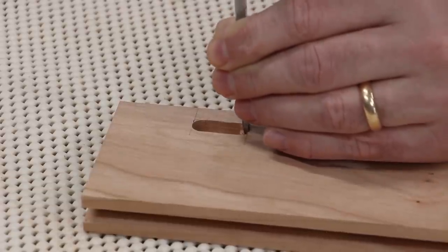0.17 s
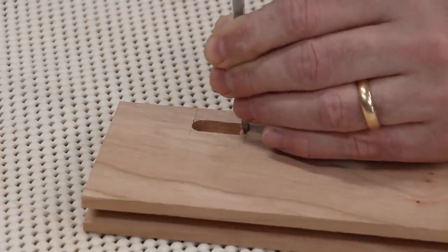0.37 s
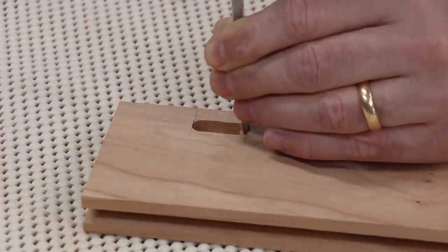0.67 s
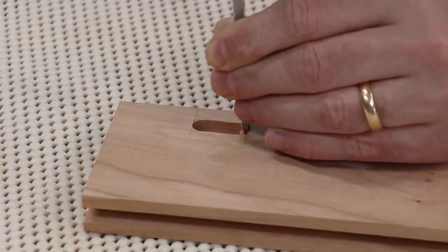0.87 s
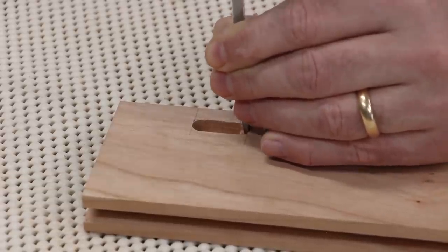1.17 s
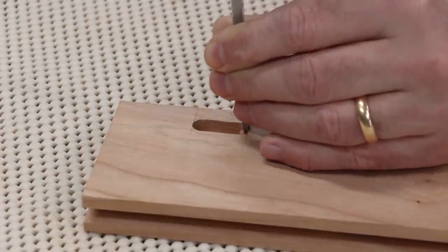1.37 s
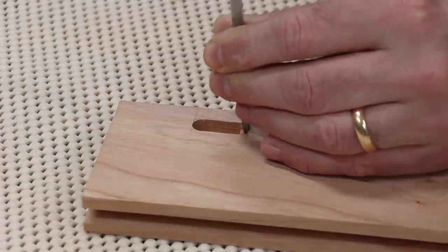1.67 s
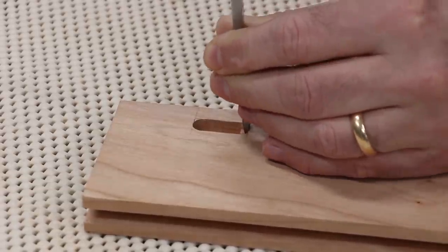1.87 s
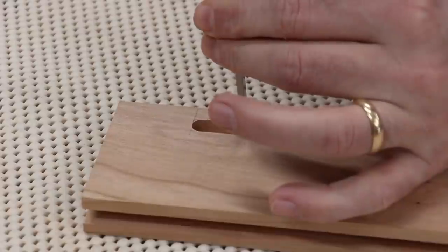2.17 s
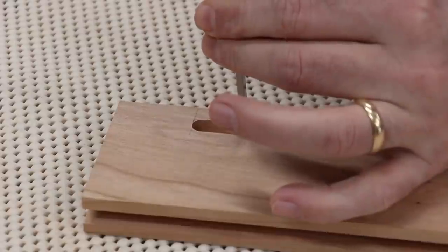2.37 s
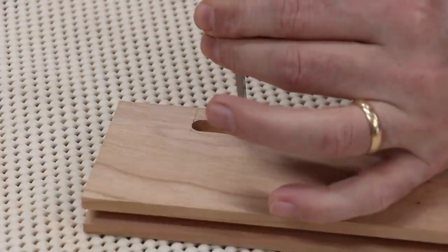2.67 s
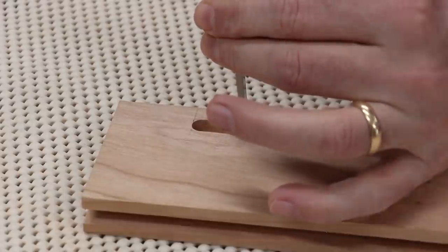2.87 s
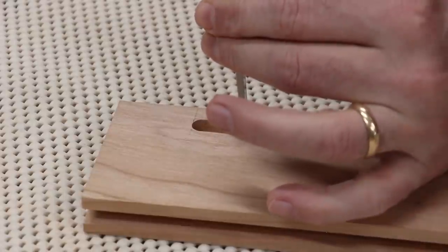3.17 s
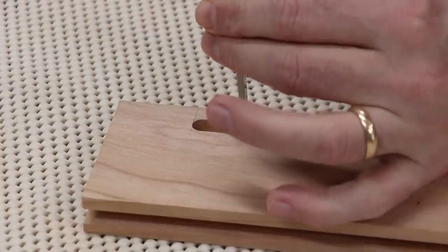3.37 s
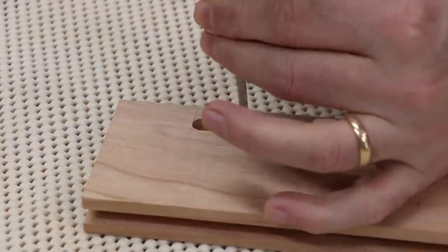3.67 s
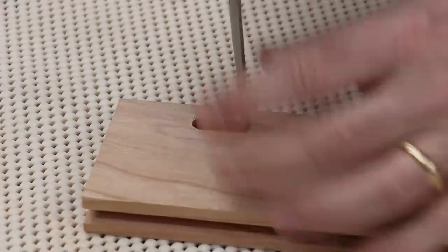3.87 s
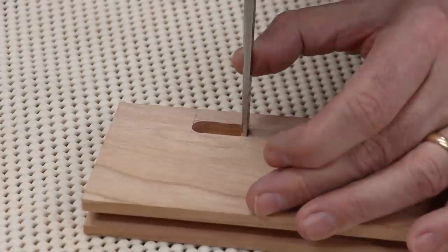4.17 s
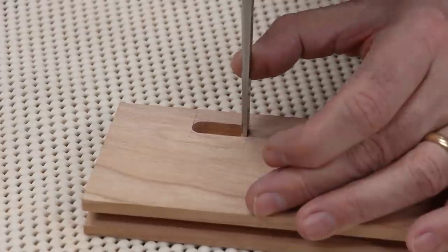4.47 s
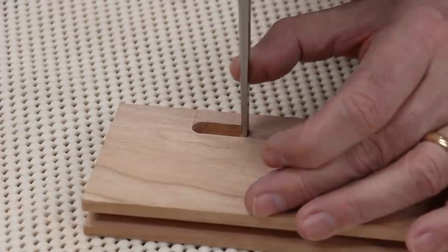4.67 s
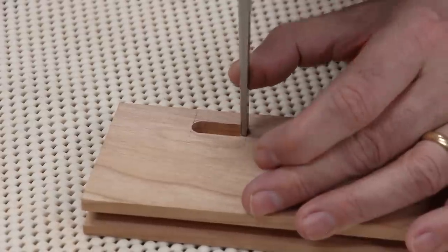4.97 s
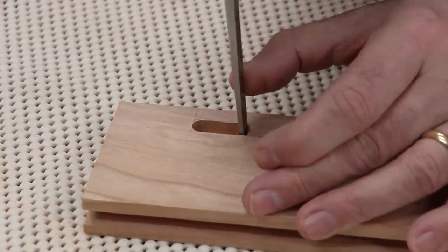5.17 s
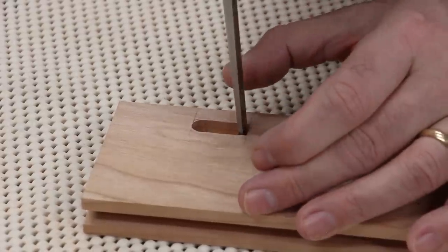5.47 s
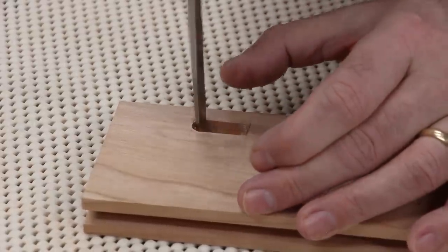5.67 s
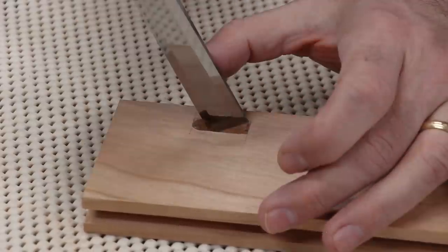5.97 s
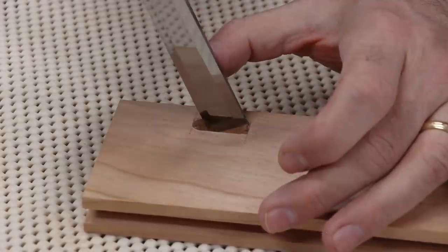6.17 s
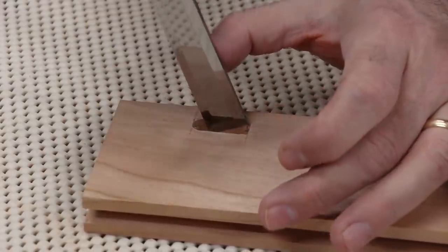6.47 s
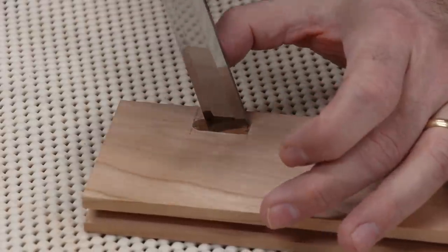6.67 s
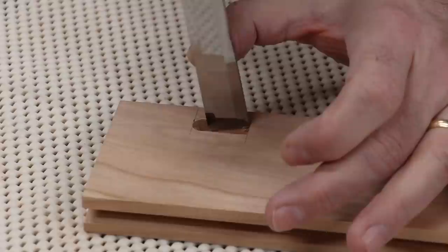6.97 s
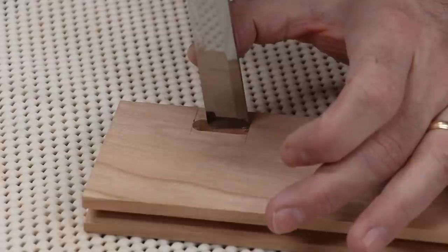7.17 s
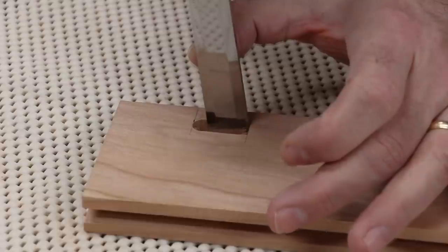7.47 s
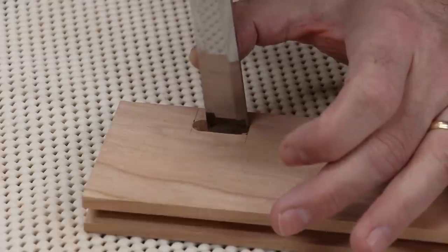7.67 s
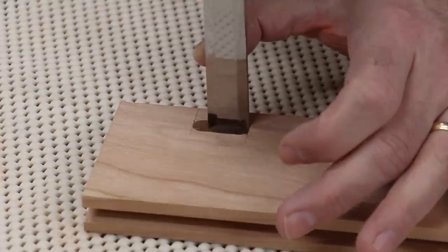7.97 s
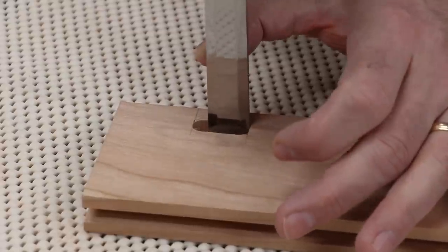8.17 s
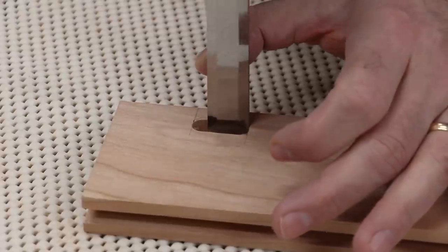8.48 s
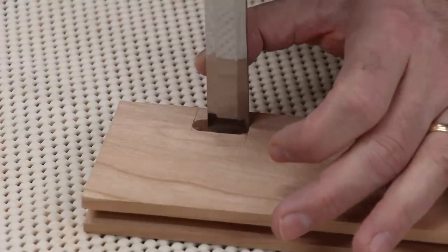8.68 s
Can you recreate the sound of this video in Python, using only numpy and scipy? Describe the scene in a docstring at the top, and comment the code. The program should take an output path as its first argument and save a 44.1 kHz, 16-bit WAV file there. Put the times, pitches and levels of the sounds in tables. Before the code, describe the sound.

Hard mallet blows crack on a chisel in wood, overloading and echoing in a small workshop, then hand paring crunches and thuds softly.

```python
"""In a small workshop, a mallet drives a chisel into a board on a workbench, and its sharp blows overload the input.
Each blow is a crack, a rattle of board and chisel, a note of the handle and a low swing of the bench top.
Then the chisel pares by hand pressure: snapping fibres crunch, the blade rings along and lands with a soft thud.
Sliding fingers hiss, the board is bumped and gives small tocks; echoes, a steady rumble, hiss and a thin
whine lie behind it all."""
import sys
import numpy as np
from scipy import signal
from scipy.fft import rfft, irfft
from scipy.io import wavfile
from scipy.ndimage import uniform_filter1d

SR = 44100
rng = np.random.default_rng(int(sys.argv[2]) if len(sys.argv) > 2 else 0)


def persist_wave(psi):
    """Save psi, clipped to +-1, as 16-bit WAV."""
    counts = np.round(np.clip(psi, -1, 1) * 32767).astype(np.int16)
    wavfile.write(sys.argv[1], SR, np.atleast_2d(counts).T)


N = 388962

LEAD_S = 0.5  # computed before the start, so that an earlier blow can still be heard dying away
TIME = np.arange(-int(LEAD_S * SR), N) / SR
AGE = np.arange(SR) / SR  # time since a single sound began [s]


def undb(db):
    """Turn decibels into a gain."""
    return 10 ** (np.asarray(db) / 20)


def unit(x):
    """Scale to an rms of 1."""
    return x / np.std(x)


def along(points, hz):
    """Read a curve of (frequency [Hz], value) points on a logarithmic frequency axis."""
    f, value = np.transpose(points)
    return np.interp(np.log(hz + 1), np.log(f), value)


def through(x, response):
    """Pass a sound through an impulse response."""
    return signal.fftconvolve(x, response)[:len(x)]


def soften(x, hz, order=2):
    """Low-pass: a longer contact takes away the treble."""
    lowpass = signal.butter(order, min(hz, SR / 2 - 1), fs=SR, output="sos")
    return signal.sosfilt(lowpass, x)


def fade(t60):
    """Exponential decay that loses 60 dB in t60 seconds."""
    return np.exp(-np.log(1000) * AGE / t60)


def swing(hz, t60):
    """One damped vibration: a sine that fades."""
    return np.sin(2 * np.pi * hz * AGE) * fade(t60)


def scatter(envelope, smooth_hz=150):
    """Many tiny random echoes under an envelope, with an even overall spectrum."""
    spectrum = rfft(rng.standard_normal(SR) * envelope)
    power = uniform_filter1d(np.abs(spectrum) ** 2, smooth_hz)  # the bins are 1 Hz apart
    return irfft(spectrum / np.sqrt(power)) * (envelope > undb(-75))


def add(track, s, sound):
    """Mix a sound in at time s."""
    i = np.searchsorted(TIME, s)
    track[i:i + len(sound)] += sound[:len(track) - i]


def resonator(bed, modes=(), size=16384):
    """Impulse response of an object: a broad spectrum with resonances on top, reacting as early as it can."""
    freq = np.fft.rfftfreq(size, 1 / SR)
    power = undb(along(bed, freq)) ** 2
    for hz, width, db in modes:
        power = power + undb(db) ** 2 / (1 + ((freq - hz) / width) ** 2) ** 2
    # folding the cepstrum forward in time gives the minimum-phase response
    cepstrum = irfft(np.log(power) / 2)
    cepstrum[1:size // 2] *= 2
    cepstrum[size // 2 + 1:] = 0
    return irfft(np.exp(rfft(cepstrum)))


def colour(x, points):
    """Filter with a curve of (frequency [Hz], gain [dB]) points."""
    return through(x, resonator(points))


# tone of the steady background: (frequency [Hz], relative level [dB])
AIR = [(20, -11), (40, -9), (65, -2), (93, 0), (150, -6), (200, -9), (300, -15), (450, -21), (950, -26),
       (2000, -30), (3600, -30), (5700, -35), (11000, -36), (16000, -45)]


def background(air_db=-68.7, whine_hz=10960, whine_db=-98.5):
    """Low room rumble and hiss are filtered noise; a thin electrical whine is a sine."""
    air = undb(air_db) * unit(colour(rng.standard_normal(len(TIME)), AIR))
    whine = undb(whine_db) * unit(np.sin(2 * np.pi * whine_hz * TIME))
    return air + whine


# the workshop's echoes: (band centre [Hz], decay by 60 dB [s], level against the sound sent in [dB])
ROOM = [(60.4, 0.84, -6.5), (160, 0.62, -6), (354, .69, -4.5), (900, 0.55, -2.5), (1999, 0.5, -4),
        (3740, 0.5, -6.5), (5560, 0.37, -12.5), (8600, 0.062, -11), (15000, 0.2, -17.5)]


def workshop(x, first_echo_s=0.0016, build_s=0.0076, common_t60=0.62, tail_s=0.78):
    """Wall echoes build up within milliseconds and then die away, each band at its own pace."""
    onset = 1 - np.exp(-np.maximum(AGE - first_echo_s, 0) / build_s)
    echoes = rfft(scatter(onset * fade(common_t60), smooth_hz=30))
    freq = np.fft.rfftfreq(SR, 1 / SR)
    centres = np.array(ROOM)[:, 0]
    tail = 0
    for share, (hz, t60, db) in zip(np.eye(len(ROOM)), ROOM):
        # each band fades into its neighbours
        band = irfft(echoes * along(np.c_[centres, share], freq))
        # trade the common decay for the band's own, at about the same energy
        own_decay = fade(t60) / fade(common_t60) * np.sqrt(common_t60 / t60)
        tail = tail + undb(db) * band * own_decay
    return through(x, tail[AGE < tail_s])


# skin sliding over steel and wood: (start [s], end [s], level before the bass cut [dB])
RUBS = [(1.44, 1.881, -65), (1.872, 1.912, -62.5), (1.9, 2.06, -66), (3.222, 3.242, -51),
        (3.246, 3.32, -53), (3.818, 4.081, -68.5)]
# tone of the sliding skin: (frequency [Hz], relative level [dB])
SKIN = [(100, -4), (600, 1.5), (1500, 0.5), (3000, -1), (5000, -3.5), (7500, -2.5), (11000, -5.5),
        (16000, -9.5)]
RUB_CYCLES = 110  # the bass cut-off is this many cycles over the rub's length


def fingers(swell_share=0.3, stop_share=0.15, grain_db=1.76, grain_samples=300):
    """Skin hisses unevenly as the grip slides, swelling and then stopping short; quick rubs are brighter."""
    grain = unit(uniform_filter1d(rng.standard_normal(len(TIME)), grain_samples))
    skin_noise = colour(rng.standard_normal(len(TIME)), SKIN)
    hiss = unit(undb(grain_db * grain) * skin_noise)
    out = 0
    for start, end, db in RUBS:
        done = (TIME - start) / (end - start)
        slide = np.clip(np.minimum(done / swell_share, (1 - done) / stop_share), 0, 1)
        bass = soften(hiss, RUB_CYCLES / (end - start), order=1)
        out = out + undb(db) * slide * (hiss - bass)
    return out


# resonances of board and bench: (frequency [Hz], width [Hz], relative level [dB])
WOOD = [(78, 12, -9), (137, 22, 3), (168, 22, -1), (192, 16, -4), (216, 24, -1), (300, 22, 0), (374, 18, 1),
        (464, 20, -7), (556, 20, -8), (659, 20, -6), (886, 30, -4), (1151, 40, -3), (1204, 30, 2),
        (1345, 40, -6), (1414, 40, -7), (1537, 40, -8), (2009, 50, -6)]
# short, overlapping resonances under them: (frequency [Hz], relative level [dB])
WOOD_BED = [(30, -5.5), (60, -17.5), (110, -12.5), (200, -5), (420, -4.5), (720, -10), (950, -8),
            (1300, -10), (1900, -8.5), (2350, -13), (2800, -27), (5000, -34), (16000, -51)]


def knocks(events, knock_db, knock_t60, bass_hz, top_hz):
    """Each soft push makes the padded board swing for a few cycles, with a dull woody knock."""
    out, board = np.zeros(len(TIME)), resonator(WOOD_BED, WOOD)
    for s, db, hz, t60 in events:
        knock = undb(knock_db) * through(scatter(fade(knock_t60)), board)
        knock = knock - soften(knock, bass_hz, order=1)  # remove the bass
        add(out, s, undb(db) * soften(swing(hz, t60) + knock, top_hz, order=4))
    return out


# small hollow tocks of the board: (time [s], level of the swing before softening [dB])
TOCKS = [(1.54, -49), (5.847, -50)]


def tocks(hz=1137, t60=0.097):
    """Now and then the board gives a small, dry tock: a high swing and a knock without bass."""
    events = [(s, db, hz, t60) for s, db in TOCKS]
    return knocks(events, knock_db=38, knock_t60=0.059, bass_hz=894, top_hz=2000)


# a finger bumps the board: (time [s], level of the swing before softening [dB])
BUMPS = [(1.885, -44.5), (1.96, -53.5), (3.229, -31.5), (3.268, -32)]
LANDING_SHARE = 0.102  # the blade lands this share of a stroke's length after the peak


def thuds(bump_hz=96, bump_t60=0.056):
    """The blade lands on the board at the end of each stroke, and fingers bump it."""
    landings = [(s + LANDING_SHARE * length, db, hz, t60) for s, _, length, _, db, hz, t60 in STROKES]
    bumps = [(s, db, bump_hz, bump_t60) for s, db in BUMPS]
    return (knocks(landings, knock_db=38, knock_t60=0.069, bass_hz=40, top_hz=720)
            + knocks(bumps, knock_db=35.5, knock_t60=0.048, bass_hz=50.62, top_hz=218))


def pressure(s, db, length, rise=0.57, roundness=1.15):
    """The push on the edge swells to a peak at s and gives way; returns its start and its shape."""
    # rise is the share spent swelling; roundness 1 is a pointed peak, 2 a bell
    along_push = np.arange(-2, 4, 1 / (length * SR))
    away = np.maximum(-along_push / rise, along_push / (1 - rise))
    return s - 2 * length, undb(db) * np.exp(-away ** roundness)


# paring strokes, each a crunch that ends in a thud: (time of the peak [s], crunch level [dB],
# length [s], blade ring against the crunch [dB], thud level before softening [dB],
# thud pitch [Hz], thud decay by 60 dB [s])
STROKES = [(4.23, -48, .016, -5, -37.5, 245, .01), (4.641, -47.5, 0.016, -14, -40, 272, 0.014),
           (4.804, -37.5, .016, -11, -24, 250, 0.011), (4.843, -40.5, .011, 2.5, -18, 260.4, 0.0073),
           (5.658, -47, .016, 1, -36, 233.3, 0.083), (7.59, -40.5, 0.0181, -6.5, -30.5, 312, 0.048)]
# light touches of the edge, from ticks to short scrapes: (time of the peak [s], level [dB], length [s])
TOUCHES = [(3.145, -70, 0.0041), (4.305, -65, 0.011), (4.589, -66.5, .012), (4.734, -63.5, 0.06),
           (5.64, -54, 0.014), (5.679, -46.5, 0.007), (5.807, -66.5, .04), (5.849, -68.5, .012),
           (6.095, -74, 0.039), (6.13, -71, 0.02), (6.54, -66, 0.0056), (6.551, -65, .01),
           (6.662, -66.5, 0.042), (6.938, -73, .025), (7.025, -71, 0.0036), (7.571, -60.5, 0.0081),
           (7.886, -64.5, 0.04), (7.969, -61, .006), (8.461, -62, 0.0022), (8.503, -63, .01),
           (8.528, -53.5, 0.0023)]
# tone of the breaking fibres: (frequency [Hz], relative level [dB])
FIBRES = [(60, -14), (200, 3), (650, 2), (1050, -4), (1800, 1), (2700, -2), (4000, 0), (5500, -6),
          (8000, -11), (12000, -17), (16000, -24)]
# resonances of the hand-held blade: (frequency [Hz], width [Hz], relative level [dB])
BLADE = [(1570, 70, -4), (2010, 80, -1), (2450, 120, -3), (3540, 160, 3), (4090, 120, -1), (4670, 120, -5),
         (7700, 300, -12)]
# the blade's broad rasp: (frequency [Hz], relative level [dB])
BLADE_BED = [(600, -25), (1200, -16), (1800, -9), (4300, -10), (6000, -16), (10000, -22), (16000, -32)]
# a brief touch leaves the blade free to ring, a long one damps it: a typical length and its ring
TOUCH_S, TOUCH_RING_DB, DAMPING_DB_PER_DOUBLING = 0.0065, 2.5, 3.9


def paring(snaps_per_s=6000, spread_db=3, snap_hz=13000):
    """Fibres snap in a dense crackle that swells until the chip gives way; the blade rings along."""
    snaps = (rng.random(len(TIME)) < snaps_per_s / SR) * rng.choice([-1, 1], len(TIME))
    snaps = snaps * undb(spread_db * rng.standard_normal(len(TIME)))  # some snap harder
    snaps = soften(unit(snaps), snap_hz, order=1)
    contacts = [(s, db, length, ring_db) for s, db, length, ring_db, *_ in STROKES]
    for s, db, length in TOUCHES:
        damping_db = DAMPING_DB_PER_DOUBLING * np.log2(length / TOUCH_S)
        contacts.append((s, db, length, TOUCH_RING_DB - damping_db))
    in_wood, in_blade = np.zeros((2, len(TIME)))
    for s, db, length, ring_db in contacts:
        start, push = pressure(s, db, length)
        add(in_wood, start, push)
        add(in_blade, start, push * undb(ring_db))
    fibres, blade = resonator(FIBRES), resonator(BLADE_BED, BLADE)
    crunch = through(snaps * in_wood, fibres / np.linalg.norm(fibres))
    ring = through(snaps * in_blade, blade / np.linalg.norm(blade))
    return crunch + ring


# swings of the bench top: (frequency [Hz], decay by 60 dB [s], level against the force [dB])
BENCH = [(142.2, .26, -51), (198, 0.29, -52.5)]


def bench():
    """The bench top swings at its own low pitches under each blow."""
    thump = sum(undb(db) * swing(hz, t60) for hz, t60, db in BENCH)
    out = np.zeros(len(TIME))
    for s, force_db, _, _ in BLOWS:
        add(out, s, undb(force_db) * thump)
    return out


# mallet blows, the first just before the start: (time [s], force [dB],
# squareness: how much the chisel rings [dB], handle note [dB])
BLOWS = [(-.17, 35.5, 1.5, -19), (0.0857, 36, 1.5, -21.5), (0.62, 34, -6, -17), (0.8106, 35, -3, -23.5),
         (0.9884, 34, -8, -21), (2.3303, 28.5, -3, -4), (2.5804, 34.5, 2, -18)]
# resonances of chisel and handle: (frequency [Hz], width [Hz], relative level [dB])
CHISEL = [(2620, 60, -14), (2999, 60, -7), (3504, 80, -7), (3880, 70, -14)]
# the broad clack of the handle: (frequency [Hz], relative level [dB])
CHISEL_BED = [(1500, -28.5), (2400, -19), (3400, -6), (4200, -15), (4900, -20), (6500, -22.5),
              (8500, -24.5), (11000, -24.5), (16000, -25)]
# a squarer blow is a shorter contact: its cut-off at 0 dB, and the squareness that doubles it
CONTACT_HZ, SQUARE_DB_PER_OCTAVE = 6400, 15
HANDLE_HZ, HANDLE_T60_S = 1907, 0.03  # the handle's one clear note


def mallet(board_t60=0.055, clack_t60=0.024, note_db=-34, crack_db=-31.5, crack_t60=0.014, crack_hz=11000):
    """Each blow cracks on the handle and rattles through board and chisel, never quite the same twice."""
    out = np.zeros(len(TIME))
    board, handle = resonator(WOOD_BED, WOOD), resonator(CHISEL_BED, CHISEL)
    note = undb(note_db) * swing(HANDLE_HZ, HANDLE_T60_S)
    for s, force_db, square_db, handle_db in BLOWS:
        wood = through(scatter(fade(board_t60)), board)
        chisel = through(scatter(fade(clack_t60)), handle)
        crack = undb(crack_db + square_db) * soften(scatter(fade(crack_t60)), crack_hz)
        contact_hz = CONTACT_HZ * 2 ** (square_db / SQUARE_DB_PER_OCTAVE)
        ringing = wood + undb(square_db) * chisel + undb(handle_db) * note
        add(out, s, undb(force_db) * (crack + soften(ringing, contact_hz)))
    return out


def scene(blow_room_db=0.0, hand_room_db=-1):
    """Mix all sources; the mallet, striking higher up, fills a little more of the room than the handwork."""
    blows = mallet()
    handwork = paring() + thuds() + fingers()
    room = workshop(undb(blow_room_db) * blows + undb(hand_room_db) * handwork)
    mix = background() + room + tocks() + handwork + bench() + blows
    return mix[None, -N:]  # drop the lead-in


def record(dry, clip_db=-9.9, top_hz=15900):
    """The overloaded input flattens every peak above its limit; then the top is cut."""
    limit = undb(clip_db)
    clipped = np.clip(dry, -limit, limit)
    top_cut = signal.ellip(10, 0.1, 80, top_hz, fs=SR, output="sos")
    return signal.sosfilt(top_cut, clipped)


dry = scene()
out = record(dry)
persist_wave(out)
```